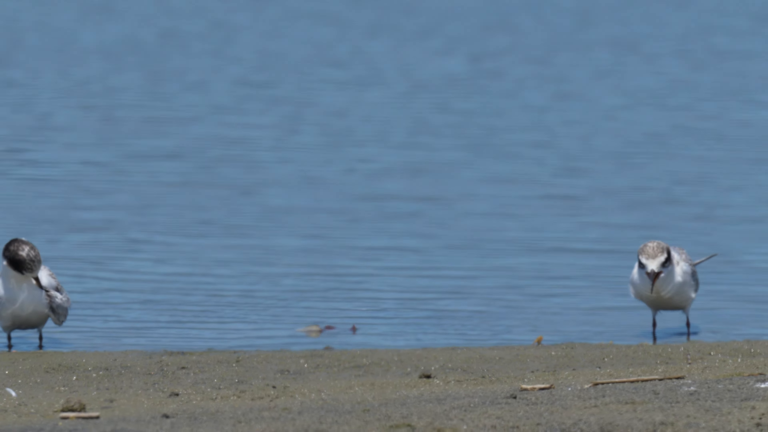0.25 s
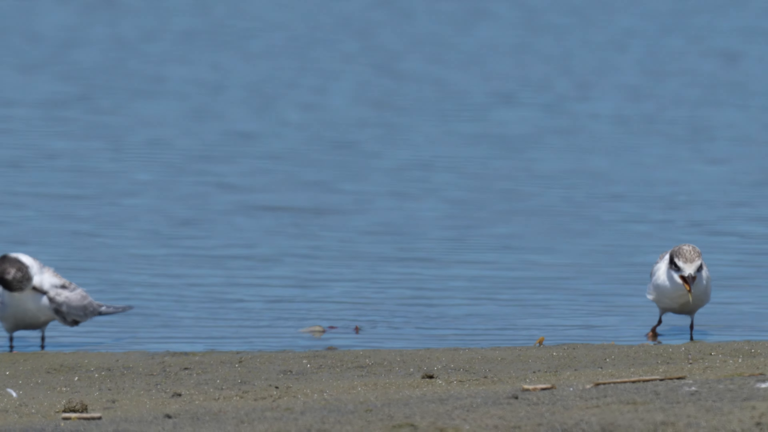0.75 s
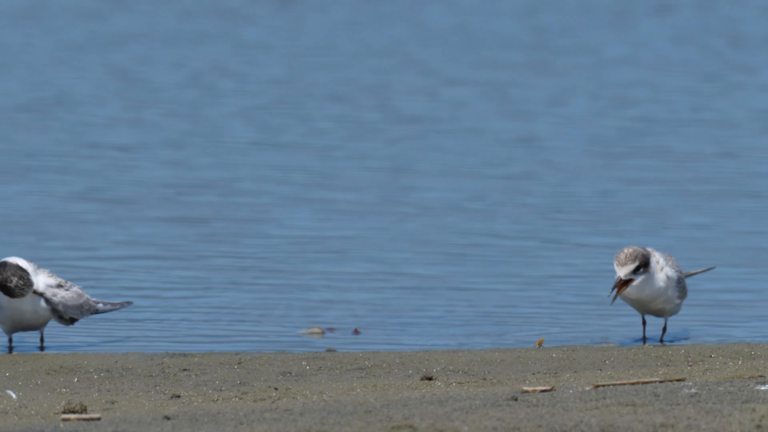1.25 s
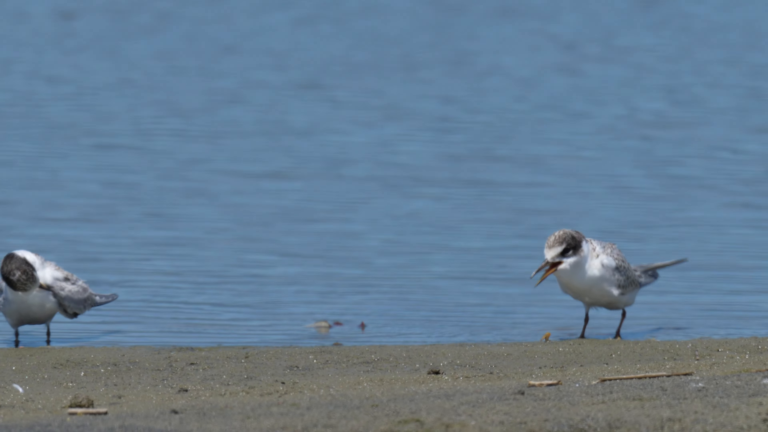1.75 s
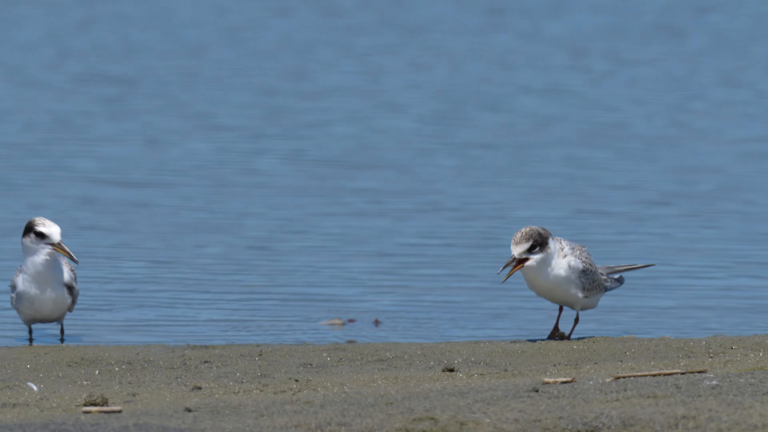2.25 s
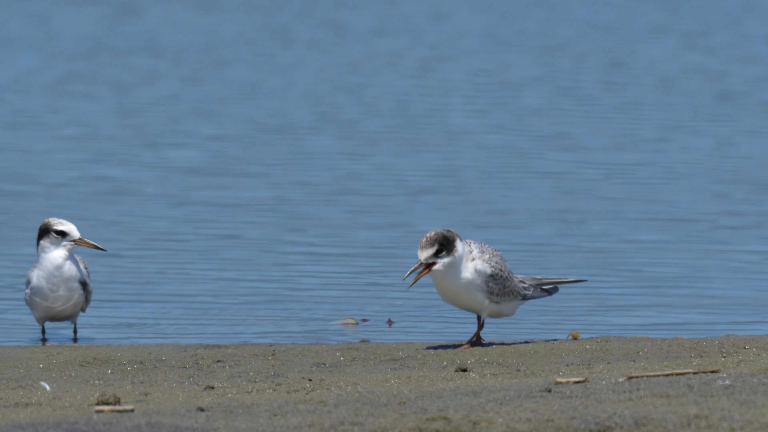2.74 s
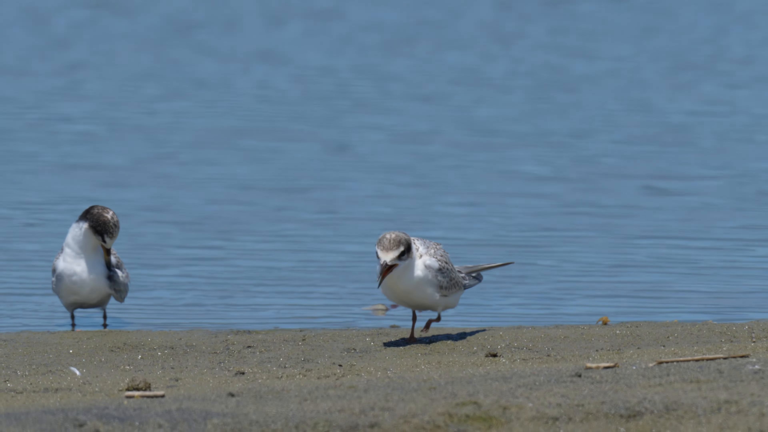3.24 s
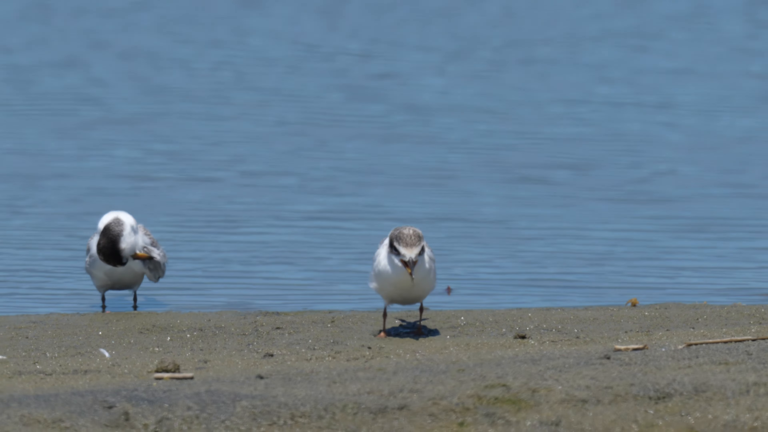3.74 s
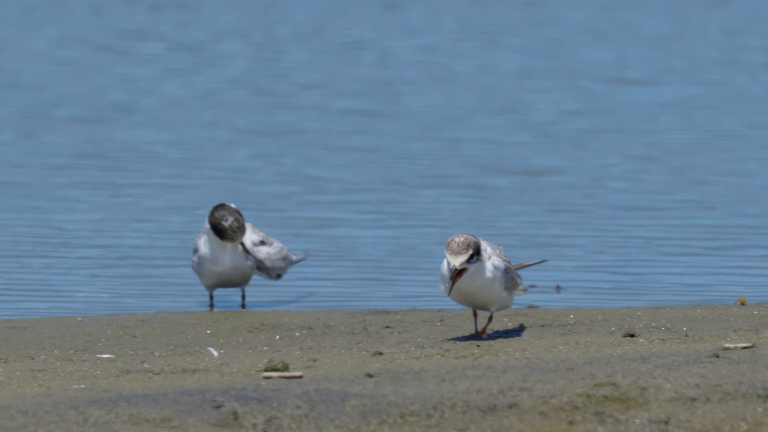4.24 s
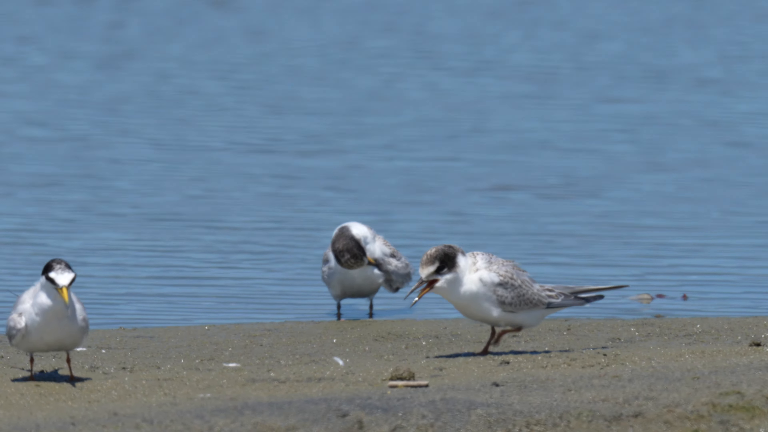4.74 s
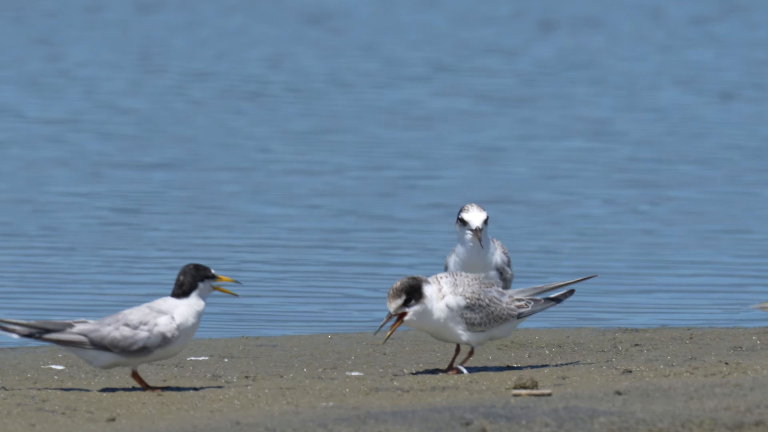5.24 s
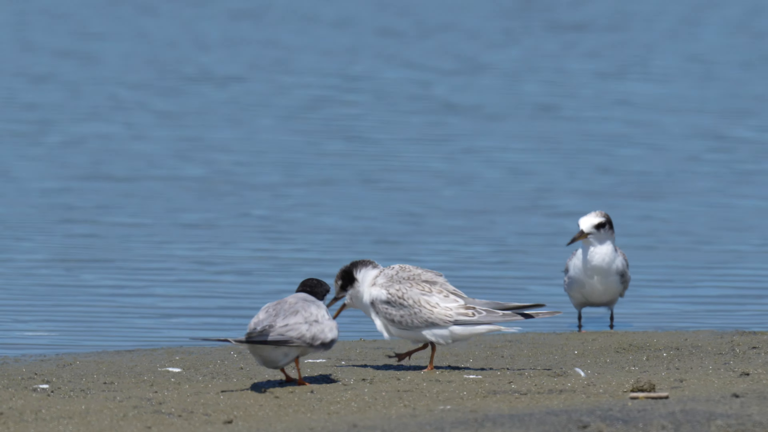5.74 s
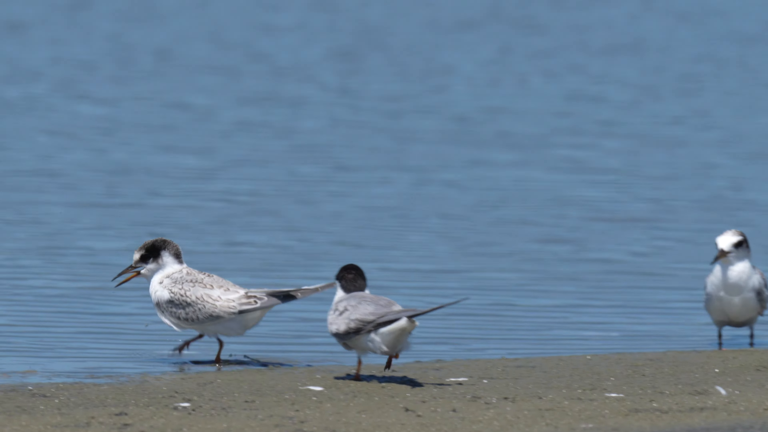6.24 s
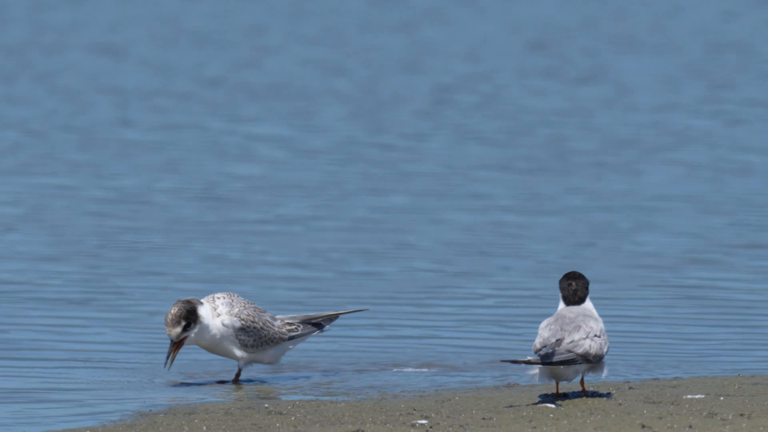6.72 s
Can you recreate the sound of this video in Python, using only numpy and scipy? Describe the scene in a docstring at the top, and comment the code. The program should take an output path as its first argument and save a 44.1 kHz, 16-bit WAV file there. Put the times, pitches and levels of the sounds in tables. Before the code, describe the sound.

Fast, high, squeaky begging chirps run on almost without pause, with one harsh adult call near the end, faint colony chatter and gentle water.

```python
"""On a sandy shore a young tern begs, about six chirps a second. A typical chirp sweeps up, breaks into a
high and then a lower whistle, dips hoarsely and ends on a short whistle: gliding sines with octaves.
An adult rasps close by and others call farther off, as pulse trains and air noise filtered by a throat.
Behind them water washes, as coloured noise, and soft gusts, a bump and two taps touch the microphone."""
import sys
import numpy as np
from scipy import signal
from scipy.fft import rfft, irfft, next_fast_len
from scipy.io import wavfile

SR = 44100
rng = np.random.default_rng(int(sys.argv[2]) if len(sys.argv) > 2 else 0)


def master_out(mix):
    """Clip the mix to full scale and print it as 16-bit PCM to the path in sys.argv[1]."""
    frames = np.transpose(np.atleast_2d(mix))
    ceiling = np.clip(frames, -1, 1)
    pcm = np.round(ceiling * 32767).astype(np.int16)
    wavfile.write(sys.argv[1], SR, pcm)


N = 307818
TIME = np.arange(N) / SR

USUAL_DB, USUAL_HIGH_DB = -41, -50.5   # an ordinary chirp's lower whistles and its high one
GLIDE_FOLLOWS, OCTAVE_FOLLOWS = 0.68, 0.58   # dB in the glides per dB of effort, in their octave per dB of treble
RISE_LEAD_S, RISE_S, FALL_S = .0165, .021, 0.0106   # upsweep's lead on the chirp's nominal start; sweep lengths
SHORTEST_S = .004   # high and last whistles no longer than this stay silent

# Pitch shapes of the glides. Each entry: pitch in Hz, evenly spaced through the gesture.
RISE_HZ = [2354, 2862, 3377, 3824, 4850]
DIP_HZ = [3020, 2988, 3105, 3602, 3460]
ARCH_HZ = [3030, 2896, 3470, 3840, 3330, 2720]
FALL_HZ = [2984, 2660, 2590]
# The young tern's chirps. Each row: nominal start in seconds, lengths in seconds of the high whistle,
# main whistle, dip and last whistle, middle pitches in Hz of the high, main and last whistles,
# relative levels in dB of the treble (high whistle and the glides' octave), main and last whistles,
# left-right balance in dB.
CHIRPS = [(-0.085, 0, 0.043, 0.026, 0.026, 0, 3900, 4214, -70, -57, -47.5, 0),
          (0.098, 0.0016, 0.049, 0.018, 0.029, 0, 3920, 4080, -68, -51.5, -50.5, 3),
          (0.321, 0.0046, 0.044, .025, 0.036, 2, 4120, 4064, -81, -49.5, -49, 0),
          (0.549, 0.0044, .047, 0.018, 0.025, 0, 4010, 4160, -86, -44.5, -40.5, -1),
          (0.732, .027, 0.023, 0.0085, .026, 5667, 4010, 4240, -51, -48.5, -45, 3),
          (0.887, 0.031, 0.024, 0.0094, 0.019, 5825, 4070, 4230, -54, -47, -47.5, 1),
          (1.037, 0.032, 0.018, 0.012, 0.023, 5842, 3910, 4216, -51.5, -49.5, -46, -3),
          (1.194, 0.032, 0.018, 0.016, 0.023, 5867, 3960, 4214, -49, -47.5, -44.5, 2),
          (1.35, 0.03, 0.018, 0.015, 0.021, 5940, 4090, 4306, -45, -42, -46, 7.5),
          (1.506, 0.027, 0.014, 0.025, 0.015, 6150, 4020, 4350, -45, -43, -45, 2),
          (1.66, 0.0073, 0.034, 0.023, 0.018, 6530, 4215, 4330, -48, -40.5, -45.5, 6),
          (1.813, 0.0063, 0.036, 0.02, 0.023, 6580, 4160, 4286, -52, -42.5, -48, 7),
          (1.967, 0.034, 0.0093, 0.025, .019, 6049, 4060, 4257, -52, -47, -49, 4),
          (2.13, 0.0051, 0.04, 0.022, 0.023, 6604, 4110, 4260, -49.5, -37.5, -44, 4.5),
          (2.288, 0.0045, 0.041, 0.019, 0.013, 0, 4226, 4308, -50.5, -37, -40, 2.5),
          (2.437, 0.00085, 0.04, 0.023, 0.014, 0, 4184, 4326, -43, -33, -41, 1),
          (2.585, 0.025, .015, 0.028, 0.016, 6172, 4180, 4320, -39, -34, -37, 1),
          (2.742, 0.0036, 0.038, 0.027, 0.013, 6588, 4154, 4293, -44, -33, -37, 4),
          (2.899, 0.014, 0.026, 0.026, 0.022, 6450, 4130, 4248, -46, -33.5, -38, 5.5),
          (3.068, 0.013, 0.026, 0.025, 0.022, 6302, 4090, 4241, -49.5, -39, -42, 2.5),
          (3.239, 0, 0.038, .024, 0.022, 0, 4130, 4118, -52, -41.5, -43.5, 2.5),
          (3.416, 0.022, 0.019, 0.023, 0.023, 6000, 3960, 4200, -50.5, -40.5, -38, 2),
          (3.589, 0.0054, 0.034, 0.026, 0.018, 6520, 4130, 4182, -50.5, -37, -38.5, 0),
          (3.76, 0.0026, 0.042, 0.021, .022, 0, 4130, 4175, -69, -45, -44.5, 2),
          (3.93, 0.028, 0.015, 0.022, 0.028, 5903, 3970, 4108, -54.5, -48.5, -44, 1),
          (4.124, 0.00018, 0.042, 0.023, 0.026, 0, 4110, 4140, -57, -43, -41, -2),
          (4.305, 0.034, 0.013, 0.015, 0.027, 5955, 4030, 4352, -47, -40, -44, 0),
          (4.461, .031, 0.01, 0.025, 0.013, 5998, 4240, 4450, -46.5, -43.5, -43.5, -5),
          (4.607, .029, .012, 0.02, 0.014, 5806, 4050, 4407, -51, -46.5, -50, -10),
          (4.754, 0.031, 0.013, .029, 0.0058, 6043, 4100, 4400, -49.5, -43, -42, 3),
          (4.913, 0.0043, 0.035, 0.023, 0.016, 0, 4200, 4301, -52, -40, -41, 2),
          (5.065, 0.0048, 0.036, 0.02, 0.017, 6260, 4090, 4210, -47.5, -36.5, -39.5, 2.5),
          (5.216, 0.026, 0.016, 0.029, 0.009, 5756, 4120, 4297, -45.5, -38.5, -43.5, 4),
          (5.378, .028, .012, .046, 0, 5780, 4080, 0, -44.5, -42, -36, 2),
          (5.548, 0.029, 0.016, 0.015, 0.025, 5550, 4125, 4480, -46.5, -43.5, -42.5, -2),
          (5.708, 0.032, 0.015, 0.022, 0.0088, 5635, 4130, 4566, -44, -50, -46, -2),
          (5.878, 0.031, .019, .006, 0.034, 5960, 3730, 4206, -51, -54, -48, -1),
          (6.082, 0.029, .014, 0.03, 0.027, 6300, 4080, 4204, -56.5, -49.5, -46.5, -3),
          (6.28, 0.033, 0.016, 0.046, 0.0024, 6200, 4080, 0, -52.5, -42.5, -40, 3),
          (6.449, 0.0088, 0.032, 0.047, 0, 6640, 4270, 0, -53.5, -44.5, -38, -1),
          (6.617, 0.0048, 0.03, .033, 0.017, -2, 4240, 4258, -59, -48.5, -56, -1),
          (6.803, 0.0052, 0.029, 0.019, .019, 0, 3930, 4168, -70, -53.5, -50, 4)]


def young_tern(rise_db=-64.5, rise_octave_db=1.0, dip_db=-61.5, dip_octave_db=-4.5, fall_db=-74.0,
               fall_octave_db=10.0, sweep_pan_db=-5.5, lead_s=0.001215):
    """Register breaks: glides and whistles follow one another, the glides sharing the whistles' effort."""
    tones, glides = np.zeros((2, N)), np.zeros(N)
    for (s, high_s, main_s, dip_s, last_s, high_hz, main_hz, last_hz,
         high_db, main_db, last_db, pan_db) in CHIRPS:
        effort = GLIDE_FOLLOWS * ((main_db + last_db) / 2 - USUAL_DB)
        bright = effort + OCTAVE_FOLLOWS * (high_db - USUAL_HIGH_DB)
        main_at, dip_at, last_at, end_at = s + np.cumsum([high_s, main_s, dip_s, last_s])

        rise = sweep(RISE_HZ, RISE_S, rise_db + effort, rise_db + rise_octave_db + bright)
        add(glides, s - RISE_LEAD_S, rise)
        if high_s > SHORTEST_S:
            add(tones, s - lead_s, high_whistle(high_s, high_hz, high_db))
        add(tones, main_at - lead_s, main_whistle(main_s, high_s, main_hz, main_db, pan_db))

        # without a last whistle the dip arches over and ends the chirp
        shape_hz = DIP_HZ if last_s > SHORTEST_S else ARCH_HZ
        dip = sweep(shape_hz, dip_s + 0.0051, dip_db + effort, dip_db + dip_octave_db + bright)
        add(glides, dip_at - lead_s, dip)
        if last_s > SHORTEST_S:
            add(tones, last_at - lead_s, last_whistle(last_s, last_hz, last_db, pan_db))
            fall = sweep(FALL_HZ, FALL_S, fall_db + effort, fall_db + fall_octave_db + bright)
            add(glides, end_at - lead_s, fall)
    return tones + panned(glides, sweep_pan_db)


def sweep(shape_hz, length, low_db, octave_db, jitter=0.014, shimmer_db=3.5, bill_hz=5850,
          bill_width_hz=780, third_db=-24, half_db=-8):
    """Resonance: a hoarse glide of the slack low register, its octave lit as it crosses the bill's peak."""
    size = int(max(length, .006) * SR)
    detune = 0.0096 * rng.standard_normal()
    hz = glide(shape_hz, size) * (1 + detune + jitter * wobble(size, 1100))
    phase = 2 * np.pi * np.cumsum(hz) / SR
    bill = rms_one(1 / (1 + ((2 * hz - bill_hz) / bill_width_hz) ** 4))
    # alternate cycles are unequal now and then, which adds lines halfway between the harmonics
    uneven = 1 + 2 * from_db(half_db) * wobble(size, 352) * np.cos(phase / 2)
    upper = bill * np.sin(2 * phase) + from_db(third_db) * np.sin(3 * phase)
    tone = from_db(low_db) * uneven * np.sin(phase) + from_db(octave_db) * upper
    shimmer = from_db(shimmer_db * wobble(size, 620))
    return np.sqrt(2) * tone * shimmer * gate(size, 0.0039, 0.00029)


HIGH_FALL_HZ_PER_S, HIGH_TOP_HZ = 27500, 7000   # downward slide; top of the bird's range


def high_whistle(length, mid_hz, level_db):
    """Frequency glide: the high register slides steadily down, held below the top of its range."""
    hz = np.minimum(mid_hz - HIGH_FALL_HZ_PER_S * (note_time(length) - length / 2), HIGH_TOP_HZ)
    return whistle(hz, level_db - 2.5, pan_db=-4.5, swell_db=4.0, octave_db=-21.0, attack_s=0.0024,
                   release_s=.0014, jitter=0.0088, shimmer_db=1.3, crest=0.33)


WHISTLE_JITTER = .003   # pitch unsteadiness of the lower whistles, as a share
MAIN_EXCESS_HZ, MAIN_SETTLE_S = 808, 0.0204   # starts sharp and settles, timed from the first whistle
MAIN_SAG_HZ_PER_DB = 25.5   # weaker main whistles fall farther
MAIN_SHOULDER = 1.43   # above 1 the pitch lingers at the top first


def main_whistle(length, after_s, mid_hz, level_db, pan_db, soft_attack_s=0.0068, trim_s=.001):
    """Relaxation: the voice breaks lower; a later break finds a more settled pitch and starts abruptly."""
    since_first = max(after_s, 0) + note_time(length - trim_s)
    unsettled = np.exp(-(since_first / MAIN_SETTLE_S) ** MAIN_SHOULDER)
    fall_hz = MAIN_EXCESS_HZ + MAIN_SAG_HZ_PER_DB * (USUAL_DB - level_db)
    hz = mid_hz + fall_hz * (unsettled - np.median(unsettled))
    attack_s = 0.0012 + soft_attack_s * unsettled[0] ** 4
    return whistle(hz, level_db - 2.34, pan_db, swell_db=11.0, octave_db=-35, attack_s=attack_s,
                   release_s=.004, jitter=WHISTLE_JITTER, shimmer_db=1.3, crest=0.53)


LAST_TOP_S = 0.0209   # the pitch tops out this long before the note's nominal end
LAST_DROOP_HZ, LAST_CLIMB_SHARE = 367, 0.73   # then droops; it climbs more gently


def last_whistle(length, mid_hz, level_db, pan_db):
    """Parabolic glide: an even note rounds over and droops; short ones have only the droop."""
    past_top = (note_time(length) - length + LAST_TOP_S) / (LAST_TOP_S + 0.005)
    sag = LAST_DROOP_HZ * past_top ** 2 * np.where(past_top < 0, LAST_CLIMB_SHARE, 1)
    hz = mid_hz - sag + np.median(sag)
    return whistle(hz, level_db - 0.5, pan_db, swell_db=3.5, octave_db=-39, attack_s=0.0039,
                   release_s=0.0058, jitter=WHISTLE_JITTER, shimmer_db=1.5, crest=0.4)


def whistle(hz, level_db, pan_db, swell_db, octave_db, attack_s, release_s, jitter, shimmer_db,
            crest=.5, scoop=0.024, scoop_s=0.0017, brightening=0.51):
    """Near-sinusoidal oscillation: one side of the syrinx hooks up to its pitch, swells and stops."""
    size = len(hz)
    hook = 1 - scoop * np.exp(-np.arange(size) / SR / scoop_s)
    # the bounce off the sand puts left and right a little out of step
    skew = .4 * wobble(size, 40) * np.array([[1], [-1]])
    unsteady_hz = hz * hook * (1 + jitter * wobble(size, 700))
    phase = 2 * np.pi * np.cumsum(unsteady_hz) / SR + skew
    level = level_db - swell_db * (2 * (np.linspace(0, 1, size) - crest)) ** 2
    swell = from_db(level + shimmer_db * wobble(size, 370)) * gate(size, attack_s, release_s)
    # the harder the note is pushed, the stronger its octave
    octave = from_db(octave_db + brightening * (level_db - USUAL_DB) + 1.3 * wobble(size, 80))
    tone = np.sin(phase) + octave * np.sin(2 * phase)
    return panned(swell * np.sqrt(2) * tone, pan_db)


def note_time(length, overlap_s=0.0031):
    """Overlap: time within a whistle, which runs a little into the next part of the chirp."""
    return np.arange(int((length + overlap_s) * SR)) / SR


# The near adult's rasp. Each row: time in seconds, pitch in Hz, level in dB, roughness from 0 to 1.
NEAR_RASP = [(5.285, 621, -59, 0.33), (5.298, 695, -51, 0.05), (5.305, 941, -49.5, 0.26),
             (5.337, 970, -45, 0.42), (5.352, 1016, -44, 0.15), (5.368, 1100, -41.5, 0.2),
             (5.376, 1045, -42.5, 0.17), (5.384, 913, -48.5, 0.1), (5.39, 810, -64, 0.7)]
# The near adult's throat and bill as a filter. Each row: frequency in Hz, gain in dB.
NEAR_THROAT = [(600, -12), (1000, -18), (1400, -1), (2000, 0), (3100, 0), (4200, 2.5), (5500, -4),
               (6500, -6), (7500, -21.5), (10000, -39), (12500, -16.5), (15500, -30)]


def near_adult(pan_db=-2.5):
    """Source and filter: one harsh call whose pitch rises and drops, coloured by the throat."""
    s, *columns = np.transpose(NEAR_RASP)
    call_time = np.arange(s[0], s[-1], 1 / SR)
    hz, level_db, rough = [np.interp(call_time, s, c) for c in columns]
    out = np.zeros(N)
    add(out, s[0], from_db(level_db) * rasp(hz, rough, NEAR_THROAT, jitter=0.063))
    return panned(out, pan_db)


def rasp(hz, rough, throat, jitter):
    """Source and filter: uneven pulses and the air hissing through each, rung by the throat; rms 1."""
    size = len(hz)
    phase = 2 * np.pi * np.cumsum(hz * (1 + jitter * rough * wobble(size, 900))) / SR
    harmonics = sum(np.cos(k * phase) for k in range(1, 15))
    pulses = rms_one(harmonics * from_db(4 * rough * wobble(size, 865)))
    air = rms_one(rng.standard_normal(size) * (1 + np.cos(phase)))
    share = np.clip(rough, 0, 1)
    source = np.sqrt(1 - share) * pulses + np.sqrt(share) * air
    bins = np.fft.rfftfreq(size, 1 / SR)
    gain = from_db(at_hz(throat, bins)) * (bins > 400)
    # the throat rings on where it resonates, so those pitches come later and each pulse is drawn out
    delay_s = .0012 * gain / gain.max()
    delay_turn = np.exp(-2j * np.pi * np.cumsum(delay_s) * bins[1])
    return rms_one(irfft(rfft(source) * gain * delay_turn, size))


# Rasps farther off. Each row: start in seconds, length in seconds, pitch in Hz, relative level in dB.
FAR_RASPS = [(3.157, 0.073, 1100, -67.5), (3.242, 0.043, 1055, -61.5), (3.425, 0.042, 1098, -60),
             (3.628, 0.049, 1036, -64), (3.747, 0.044, 1086, -61.5), (3.941, 0.05, 905, -67),
             (4.03, 0.055, 1089, -63.5), (4.151, 0.0645, 1067, -58), (4.371, 0.034, 1083, -61.5),
             (4.462, 0.057, 1072, -59), (4.754, 0.049, 1074, -64), (5.038, 0.1, 1042, -62.5),
             (5.139, 0.058, 1137, -60), (5.441, 0.077, 1074, -59.5), (5.745, 0.087, 1107, -66),
             (6.092, 0.078, 1137, -64.5), (6.308, 0.062, 1138, -62), (6.788, 0.056, 1097, -69.5),
             (6.925, 0.069, 1050, -67.5)]
# Distant whistles. Each row: start in seconds, length in seconds, pitches in Hz at the start, middle
# and end, level in dB.
FAR_WHISTLES = [(1.298, 0.033, 3930, 3730, 3770, -60.5), (1.328, 0.047, 3370, 3810, 3530, -57.5),
                (1.556, 0.064, 3590, 3830, 3530, -58.5), (3.164, 0.082, 4200, 4370, 4325, -63.5),
                (3.85, 0.09, 2600, 2966, 3020, -69), (3.914, 0.06, 3810, 3824, 3410, -59),
                (3.961, 0.027, 2970, 2730, 2545, -62), (5.752, 0.057, 3520, 3750, 3800, -54),
                (6.095, 0.027, 2230, 2290, 2330, -58.5), (6.321, 0.0382, 2400, 2260, 2030, -60),
                (6.808, 0.047, 3790, 4040, 4100, -61.5), (6.871, 0.023, 3270, 3500, 3450, -54),
                (6.893, 0.0332, 3480, 3830, 3960, -49)]
# The far adults' throat and bill as a filter. Each row: frequency in Hz, gain in dB.
FAR_THROAT = [(700, -28), (1400, -5.5), (2150, -2), (3100, 0.5), (4200, 4), (5600, 3), (6500, -3),
              (7500, -16.5), (12500, -27), (15500, -17)]


def colony(rasp_pan_db=-12.5, whistle_pan_db=-7.5, rough=0.33, octave_db=-13):
    """Superposition: the rasps and whistles of other terns along the shore add together."""
    rasps, tones = np.zeros((2, N)), np.zeros((2, N))
    for s, length, hz, level_db in FAR_RASPS:
        add(rasps, s, from_db(level_db) * far_rasp(length, hz, rough))
    for s, length, start_hz, mid_hz, end_hz, level_db in FAR_WHISTLES:
        size = int(length * SR)
        hz = glide([start_hz, mid_hz, end_hz], size) * (1 + 0.017 * wobble(size, 600))
        phase = 2 * np.pi * np.cumsum(hz) / SR
        octave = from_db(octave_db + at_hz(FAR_THROAT, 2 * hz))
        tone = np.sin(phase) + octave * np.sin(2 * phase)
        swell = from_db(level_db + 3.6 * wobble(size, 320)) * gate(size, 0.0029, 0.0086)
        add(tones, s, swell * np.sqrt(2) * tone)
    return panned(rasps, rasp_pan_db) + panned(tones, whistle_pan_db)


def far_rasp(length, hz, rough, swell_db=3.0, arch=0.058, gain_db=2.0):
    """Source and filter: a short rasp of arched, wavering pitch, swelling and fading."""
    size = int(length * SR)
    away = np.linspace(-1, 1, size) ** 2
    pitch = hz * (1 - arch * away) * (1 + 0.0162 * wobble(size, 58.5))
    swell = from_db(gain_db - swell_db * away + 1.5 * wobble(size, 216))
    return gate(size, 0.0031, 0.006) * swell * rasp(pitch, rough, FAR_THROAT, jitter=0.018)


def chatter(level_db=-69, count=30, from_s=.6, to_s=6.1):
    """Random superposition: faint falling whistles deeper in the colony, in either register."""
    out = np.zeros(N)
    for when, length, pitch, register in rng.random((count, 4)):
        size = int((0.064 + 0.061 * length) * SR)
        base_hz = (3900 + 600 * pitch) * (1.35 if register > .65 else 1)
        hz = base_hz * glide([1.02, 1.01, .96], size) * (1 + 0.04 * wobble(size, 700))
        tone = np.sin(2 * np.pi * np.cumsum(hz) / SR)
        add(out, from_s + when * (to_s - from_s), from_db(level_db) * gate(size, 0.0055, 0.015) * tone)
    return panned(out, -5.0)


def open_air(x, early_db, early_t60, late_db, late_t60, pan_db):
    """Scattering: sand and ripples diffuse the calls at once; banks return a faint longer tail."""
    t = np.arange(SR // 2) / SR
    early, late = rng.standard_normal((2, 2, 2, len(t)))
    early = rms_one(early * from_db(-60 * t / early_t60) * (t > .002))
    late = rms_one(late * from_db(-60 * t / late_t60) * (t > .015))
    scatter = panned(from_db(early_db) * early + from_db(late_db) * late, pan_db) / np.sqrt(len(t))
    mono = x.mean(0, keepdims=True)
    one, other = [signal.fftconvolve(mono, paths, axes=1)[:, :N] for paths in scatter]
    turn = np.pi * wobble(N, 4.4)   # the paths change as the birds walk and turn their heads
    return x + np.cos(turn) * one + np.sin(turn) * other


def echo(x, pan_db=-9.0, delay_s=0.016, level_db=-20):
    """Specular reflection: the water throws the calls back once, a little later."""
    lag = int(delay_s * SR)
    return panned(np.pad(x.mean(0), (lag, 0))[:N] * from_db(level_db), pan_db)


# Colour of the water's wash and the hiss above it. Each row: frequency in Hz, relative density in dB per Hz.
SHORE_COLOUR = [(100, -10), (280, -15), (400, -12.5), (490, 0.5), (590, -6), (760, 2), (1400, -0.5),
                (2400, -4.5), (3500, -3), (5000, -5.5), (7500, -12), (10000, -14), (12500, -14),
                (15500, -15)]
# The wash's place. Each row: frequency in Hz, left-right balance in dB.
SHORE_PAN = [(250, -0.5), (500, 2), (800, -4.5), (1500, -8), (3000, -1.5), (6000, -1.5), (12000, -1)]
# The wash's width. Each row: frequency in Hz, left-right likeness (1 is identical).
SHORE_LIKENESS = [(100, 1), (280, 0.67), (600, 0.17), (2000, 0.009), (12000, 0.015)]


def shore(level_db=-59.5):
    """Broadband noise: the steady wash of water, coloured and spread by frequency."""
    return from_db(level_db) * noise(SHORE_COLOUR, SHORE_LIKENESS, SHORE_PAN)


GUST_ATTACK_SHARE, GUST_FADE_DB = 0.78, 27   # build-up as a share of the length; fade over one length
# Gusts on the microphone. Each row: peak time in seconds, length in seconds, rumble in dB, buffeting in dB.
GUSTS = [(0.07, .11, -56.5, -63.5), (0.108, 0.031, -59, -56.5), (0.25, 0.17, -65.5, -65),
         (0.625, 0.053, -59, -86), (0.802, 0.23, -65, -70), (5.055, 0.13, -72, -57),
         (5.232, 0.064, -74, -70), (5.532, 0.24, -61, -70), (5.815, 0.13, -72, -65),
         (5.927, 0.13, -60, -68.5), (6.236, 0.33, -79, -78), (6.882, 0.23, -83, -78.5)]
# The light breeze between gusts. Each row: time in seconds, rumble in dB, buffeting in dB.
BREEZE = [(0, -69, -76), (1.5, -73, -83), (2.1, -81.5, -86), (3.7, -76.5, -102), (4.7, -75, -92),
          (6.98, -73.5, -101)]
# Colour of the wind's rumble. Each row: frequency in Hz, relative level in dB.
RUMBLE_COLOUR = [(10, -26), (18, 3), (26, 1), (38, 5), (52, -6), (70, -12), (120, -33), (200, -50)]
# Colour of the wind's buffeting. Each row: frequency in Hz, relative level in dB.
BUFFET_COLOUR = [(29, -54), (50, -3), (80, 0), (118, -4), (236, -18.5), (368, -38), (414, -43), (450, -39),
                 (580, -48), (990, -120)]


def wind():
    """Turbulence: low rumble and higher buffeting add in power; gusts build faster than they fade."""
    s, *columns = np.transpose(BREEZE)
    power = from_db([np.interp(TIME, s, c) for c in columns]) ** 2
    for peak_s, length, low_db, high_db in GUSTS:
        age = (TIME - peak_s) / length
        away = np.minimum(np.maximum(age, -age / GUST_ATTACK_SHARE), 10)
        gust_db = np.array([[low_db], [high_db]]) - GUST_FADE_DB * away ** 2
        power = power + from_db(gust_db) ** 2
    rumble, buffet = np.sqrt(power)
    likeness, centre = [(30, 1.0), (200, 0.79)], [(30, 0), (200, 0)]
    low = rumble * noise(RUMBLE_COLOUR, likeness, centre)
    return low + buffet * noise(BUFFET_COLOUR, likeness, centre)


def thump(start_s=.227, level_db=-44, hz=108, t60=0.027):
    """Damped oscillation: a soft bump of air on the microphone swings out in a few slow cycles."""
    t = np.clip(TIME - start_s, 0, 1)
    return from_db(level_db - 60 * t / t60) * np.sin(2 * np.pi * hz * t)


# Small handling knocks. Each row: start in seconds, relative level in dB.
KNOCKS = [(4.683, -31.5), (6.883, -30.5)]


def knocks(gain_db=-24.5, t60=0.1, low_hz=250, high_hz=2400):
    """Impact: short dull handling taps, each a decaying burst of band-limited noise."""
    out, t = np.zeros((2, N)), np.arange(SR // 10) / SR
    body = signal.butter(1, [low_hz, high_hz], "band", fs=SR, output="sos")
    for s, level_db in KNOCKS:
        burst = rms_one(signal.sosfilt(body, rng.standard_normal((2, len(t)))))
        add(out, s, from_db(level_db + gain_db - 60 * t / t60) * burst)
    return out


def noise(spectrum, likeness, pan):
    """Spectral shaping: stereo noise with a colour, a left-right likeness and a balance; rms 1."""
    size = next_fast_len(N)
    hz = np.fft.rfftfreq(size, 1 / SR)
    mid, side = rfft(rng.standard_normal((2, size)))
    alike = np.clip(at_hz(likeness, hz), -1, 1)
    pair = np.sqrt(1 + alike) * mid + np.sqrt(1 - alike) * side * [[1], [-1]]
    skirt = 1 / (1 + (hz / (2 * spectrum[-1][0])) ** 4)   # rolls off above the last point
    shaped = panned(pair, at_hz(pan, hz)) * from_db(at_hz(spectrum, hz)) * skirt
    return rms_one(irfft(shaped, size)[:, :N])


def from_db(db):
    """Logarithmic level: decibels to amplitude gain."""
    return 10 ** (np.asarray(db) / 20)


def rms_one(x):
    """Normalisation: scale to unit power."""
    return x / np.sqrt(np.mean(x ** 2) + 1e-20)


def at_hz(points, hz):
    """Interpolation: read a curve along log frequency."""
    f, value = np.transpose(points)
    return np.interp(np.log(np.maximum(hz, 1)), np.log(f), value)


def panned(x, pan_db):
    """Level difference: place a sound between left (positive dB) and right."""
    return x * from_db(np.array([pan_db, -pan_db]).reshape(2, -1) / 2)


def add(out, s, x):
    """Superposition: mix x into out from time s, cut at both ends."""
    i = int(s * SR)
    x = x[..., max(-i, 0):N - i]
    out[..., max(i, 0):max(i, 0) + x.shape[-1]] += x


def wobble(size, rate):
    """Random modulation: straight lines join normal random values drawn rate times a second."""
    knots = rng.standard_normal(int(size * rate / SR) + 3)
    return np.interp(np.arange(size) * rate / SR, np.arange(len(knots)), knots)


def glide(points, size):
    """Polynomial interpolation: a smooth curve through evenly spaced points."""
    shape = np.polyfit(np.linspace(0, 1, len(points)), points, len(points) - 1)
    return np.polyval(shape, np.linspace(0, 1, size))


def gate(size, attack_s, release_s):
    """Amplitude envelope: a rounded opening and closing."""
    t = np.arange(size) / SR
    opening = np.sin(np.pi / 2 * np.clip(t / attack_s, 0, 1))
    return opening * np.sin(np.pi / 2 * np.clip((t[-1] - t) / release_s, 0, 1))


def scene():
    """Superposition: the birds in the open, over water and wind."""
    birds = young_tern() + near_adult()
    near = open_air(birds, early_db=-14, early_t60=.07, late_db=-18, late_t60=.45, pan_db=-3.0)
    others = colony() + chatter()
    far = open_air(others, early_db=-8, early_t60=.07, late_db=-13, late_t60=.45, pan_db=-3.0)
    return near + echo(birds) + far + shore() + wind() + thump() + knocks()


def record(dry, cutoff_hz=15750):
    """Low-pass filtering: an elliptic filter cuts the top steeply."""
    return signal.sosfilt(signal.ellip(12, .1, 70, cutoff_hz, fs=SR, output="sos"), dry)


dry = scene()
out = record(dry)
master_out(out)
```